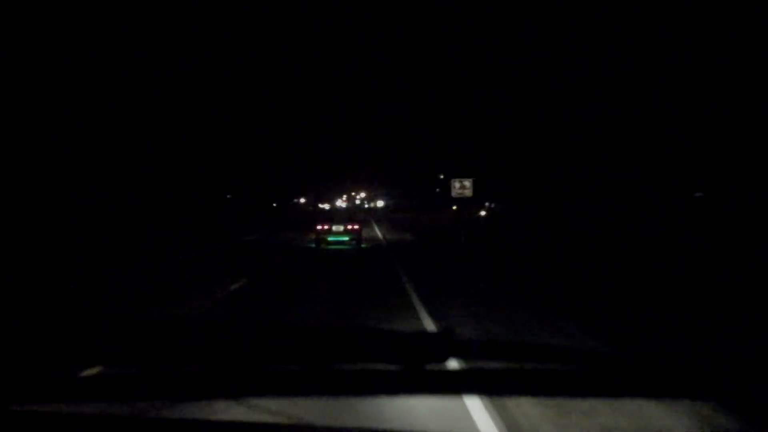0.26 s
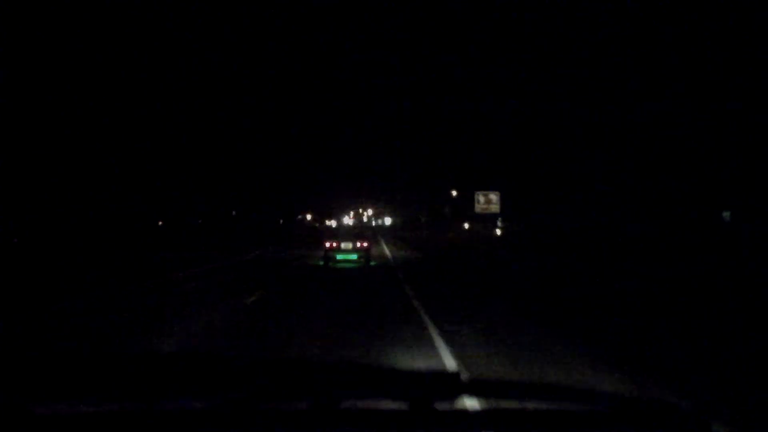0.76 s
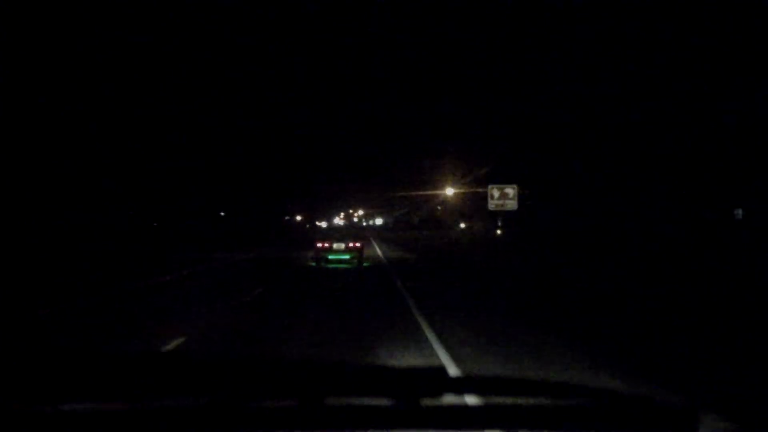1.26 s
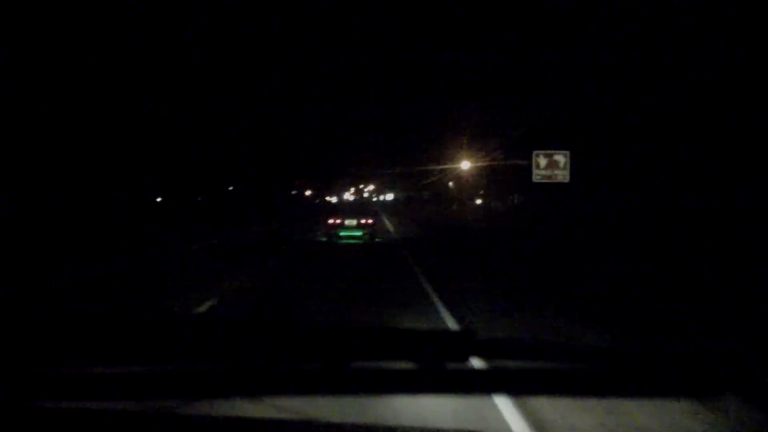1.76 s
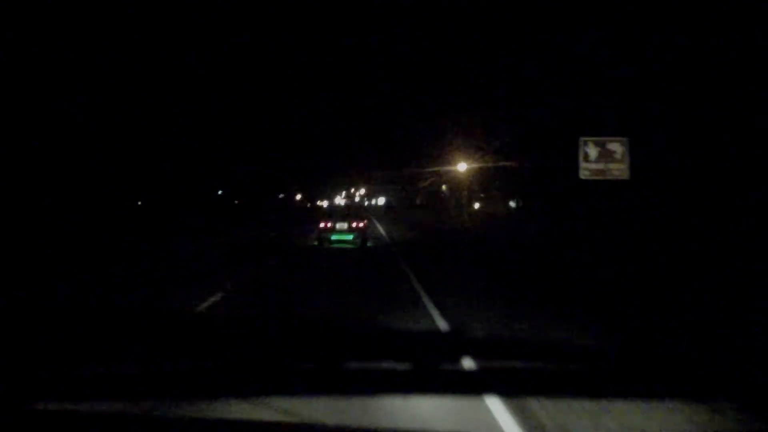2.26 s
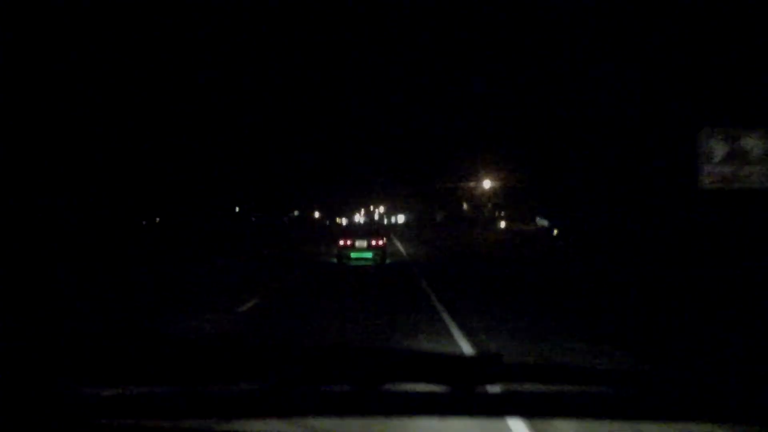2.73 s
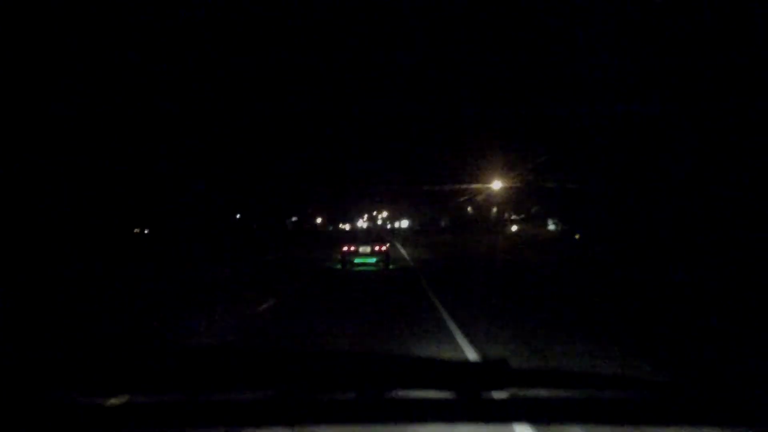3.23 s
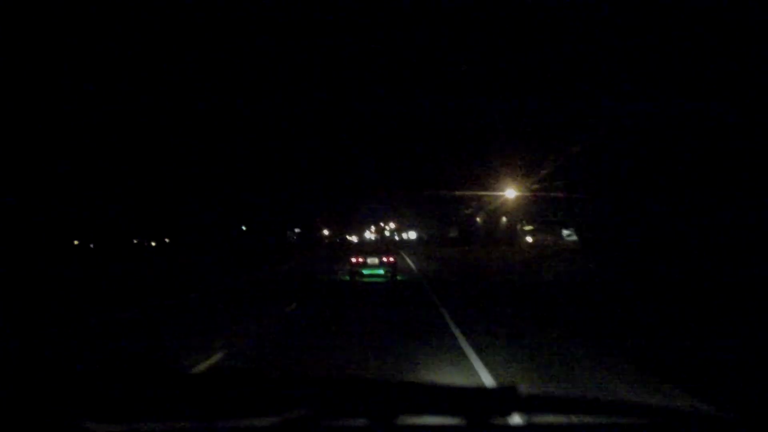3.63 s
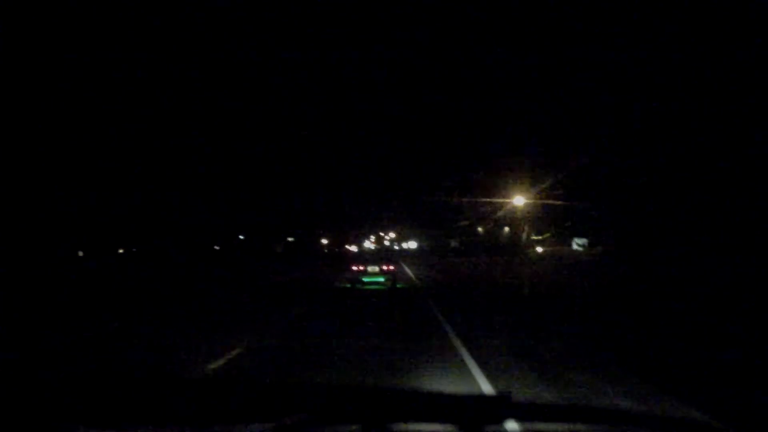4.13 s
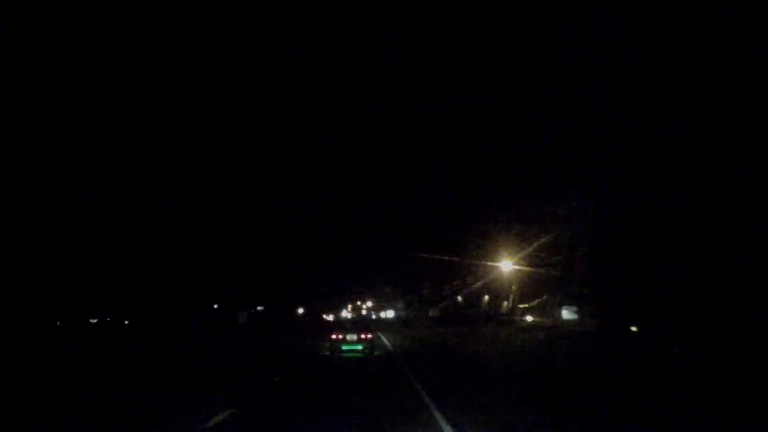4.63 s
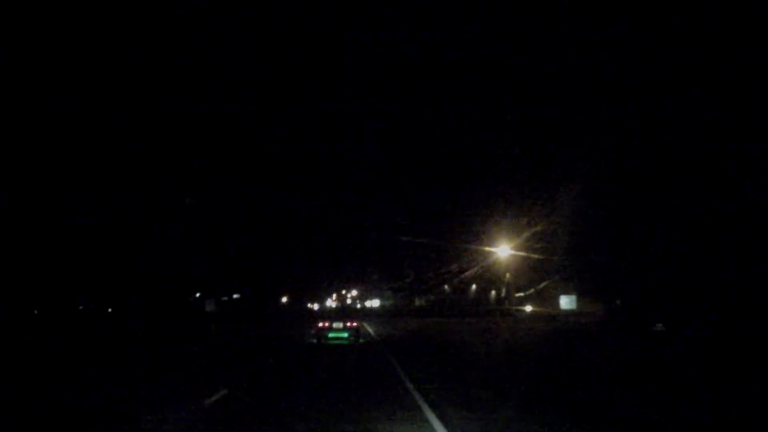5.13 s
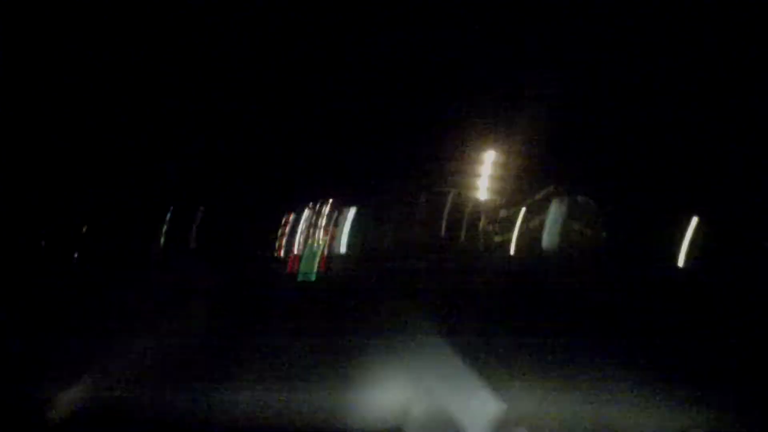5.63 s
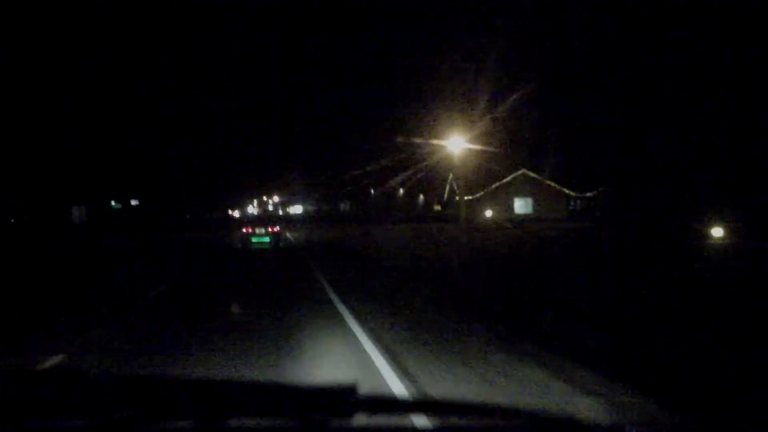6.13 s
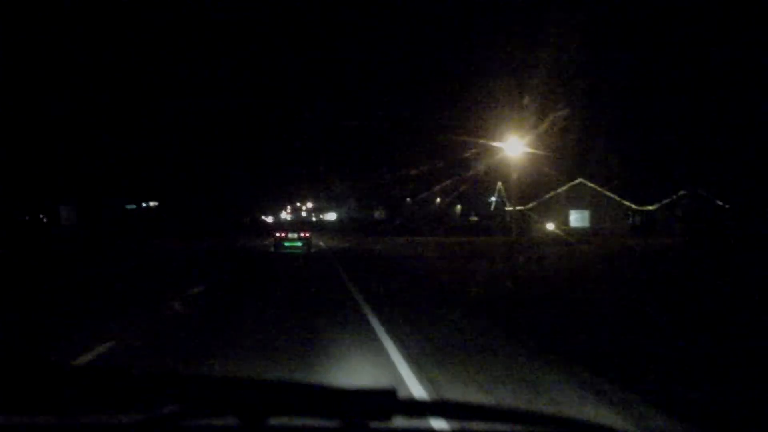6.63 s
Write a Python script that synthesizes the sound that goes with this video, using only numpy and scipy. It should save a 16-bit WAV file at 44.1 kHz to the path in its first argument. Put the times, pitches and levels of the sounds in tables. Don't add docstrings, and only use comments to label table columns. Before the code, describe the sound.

Inside a car cabin, a low engine drone cruises over road rumble, gently strains, then drops a gear with a jolt and revs hard.

```python
import sys
import numpy as np
from scipy import signal
from scipy.io import wavfile
from scipy.ndimage import uniform_filter1d

SR = 44100
rng = np.random.default_rng(int(sys.argv[2]) if len(sys.argv) > 2 else 0)


def wav_record(signal):
    frames = np.transpose(np.atleast_2d(signal))
    bounded = np.clip(frames, -1, 1)
    quanta = np.round(bounded * 32767).astype(np.int16)
    wavfile.write(sys.argv[1], SR, quanta)


def level_to_linear(level):
    exponent = np.asarray(level, float) / 20
    return 10 ** exponent


N = 303849

# time_s, cycle_rate_hz
ENGINE_SPEED = [(0.0, 12.6), (1.9, 12.47), (2.2, 13.15), (2.7, 14.07), (3.2, 14.25), (4.3, 14.36),
                (4.9, 16.15), (5.22, 17.1), (5.4, 18.15), (5.58, 18.0), (5.66, 27.5), (5.72, 32.1),
                (5.82, 34.7), (5.875, 35.1), (5.99, 33.05), (6.11, 33.9), (6.5, 34.45), (6.89, 35.5)]
# order_of_cycle, light_throttle_db (at LIGHT_HZ), wide_open_db (at FULL_HZ)
ORDER_LEVELS = [(1, -34, -24), (2, -30, -16), (3, -24, -10), (4, -34, -21), (5, -32, -24), (6, -25, -28),
                (7, -25, -29), (9, -33, -21), (10, -45, -41), (11, -35, -41), (12, -39, -33),
                (13, -44, -35), (14, -42, -34), (15, -34, -39), (16, -39, -34), (17, -55, -36),
                (18, -44, -35), (19, -36, -33), (20, -43, -39), (21, -44, -46), (22, -49, -45),
                (23, -56, -44), (24, -49, -48), (25, -56, -44), (28, -69, -50), (41, -53, -56),
                (42, -50, -48)]
# frequency_hz, gain_db
CABIN_RESPONSE = [(12, -3), (45, 0.5), (70, -12), (86, 1.5), (106, 9), (120, -0.5), (135, -7), (165, -2.5),
                  (200, -11.5), (245, -18.5), (288, -3.5), (320, -8), (350, -20.5), (600, -1.5)]
# frequency_hz, level_db
FIRING_BOOM = [(102, -24), (107, -14), (112.5, -10), (115, -11.5), (124, -17.5), (137, -31), (165, -10),
               (178, -27.5)]
# frequency_hz, width_hz, gain_db
CABIN_PEAKS = [
    (865, 22, 9),
    (1000, 25, 9),
]
# centre_s, gain_db, length_s, lowest_order, highest_order
LOAD_SURGES = [
    (5.45, 5, .32, 6, 14),
    (5.79, 5.5, .24, 1, 6),
]
LIGHT_HZ, FULL_HZ = 14.25, 34.5
COAST_HZ, PULL_HZ = 12.6, 14.1
COAST_DB, PULL_DB = -10.5, -0.6
EFFORT_DB = 3.5
FIRING_ORDER = 8
HIGH_ORDERS, HIGH_LIGHT_DB, HIGH_FULL_DB = range(26, 45), -63, -44
STEP = 8


def engine(t):
    slow = t[::STEP]
    cycle_hz = curve(ENGINE_SPEED, slow)
    turns = np.cumsum(cycle_hz) * STEP / SR
    wide = np.clip((cycle_hz - LIGHT_HZ) / (.96 * FULL_HZ - LIGHT_HZ), 0, 1) ** 1.3
    load_db = np.interp(cycle_hz, [COAST_HZ, PULL_HZ], [COAST_DB, PULL_DB])
    load_db += EFFORT_DB * (throttle(slow) - .22)
    flutter = wander(7, count=90, size=len(slow))
    start_phase = rng.uniform(-np.pi, np.pi, 45)

    firing_db = np.maximum(read(FIRING_BOOM, FIRING_ORDER * cycle_hz), -60 + 36.6 * wide)
    firing_db += 1.0 * flutter[FIRING_ORDER]
    out = level_to_linear(firing_db) * np.cos(2 * np.pi * FIRING_ORDER * turns + 2.06)

    listed = [row[0] for row in ORDER_LEVELS]
    high = [(k, HIGH_LIGHT_DB, HIGH_FULL_DB) for k in HIGH_ORDERS if k not in listed]
    for k, light_db, full_db in list(ORDER_LEVELS) + high:
        light_source_db = light_db - read(CABIN_RESPONSE, k * LIGHT_HZ)
        full_source_db = full_db - read(CABIN_RESPONSE, k * FULL_HZ)
        level_db = light_source_db * (1 - wide) + full_source_db * wide
        level_db += read(CABIN_RESPONSE, k * cycle_hz)
        level_db += load_db * min(k / 6, 1) * (1 - wide)
        for s, db, length, lowest, highest in LOAD_SURGES:
            if lowest <= k <= highest:
                level_db += db * hump(slow, s, length)
        level_db += .3 * wide + (2.2 - .9 * wide) * flutter[k]
        for f, width, db in CABIN_PEAKS:
            level_db += wide * db * np.exp(-((k * cycle_hz - f) / width) ** 2)
        lined_up = .7 * wide * max(1 - ((k - 3.5) / 2.5) ** 4, 0)
        jitter = (.1 + .005 * k) * flutter[k + 45]
        phase = 2 * np.pi * k * turns - .7 + start_phase[k] * (1 - lined_up) + jitter
        out -= level_to_linear(level_db) * np.cos(phase)
    return np.sqrt(2) * signal.resample_poly(out, STEP, 1)[:N], np.interp(t, slow, turns)


# time_s, throttle_opening (0-1)
PEDAL_TRAVEL = [(0, 0.23), (1.9, 0.2), (2.5, 0.24), (4.35, 0.27), (5.12, 0.43), (5.35, 0.48), (5.45, 0.61),
                (5.6, 0.68), (5.7, 0.79), (5.83, 0.87), (5.93, 0.93), (6.08, 0.89), (6.89, 0.94)]


def throttle(t):
    return np.clip(curve(PEDAL_TRAVEL, t), 0, 1)


# centre_s, peak_db, pitch_hz, length_s
BODY_JOLTS = [
    (5.587, 2.3, 25, .08),
    (5.8, -11, 33, .2),
    (5.635, -21, 600, .035),
    (5.74, -20, 352, .16),
    (5.66, -15, 300, .1),
    (5.67, -15, 220, .1),
    (5.72, -10, 65, .14),
    (5.9, -17, 205, .3),
]


def jolts(t):
    out = np.zeros(N)
    for s, db, hz, length in BODY_JOLTS:
        out -= level_to_linear(db) * hump(t, s, length) * np.sin(2 * np.pi * hz * (t - s))
    return out


# start_s, peak_db
TRIM_TICKS = [(0.2958, -45.5), (2.0675, -46), (2.4383, -44), (2.7618, -43.5), (3.349, -44.5), (3.6414, -42),
              (4.1616, -45), (4.5057, -40.5), (4.7125, -40), (5.185, -24.5), (5.715, -30.5),
              (5.7626, -37.5)]
# start_s, peak_db, t60_s
TRIM_RATTLE = [
    (6.1208, -11, 0.06),
    (6.1255, -8.5, 0.06),
    (6.138, -19, 0.06),
]
# frequency_hz, level_db
RATTLE_SPECTRUM = [(450, -30), (700, 7), (1050, 5), (2400, -7), (4900, -4), (6500, -12), (9900, -14),
                   (14200, -27)]
# start_s, end_s, pitch_hz, level_db
TRIM_SQUEAK = (6.145, 6.215, 8430, -42)
TICK_LO_HZ, TICK_HI_HZ, TICK_T60 = 900, 10000, .044


def trim(t):
    white = rng.standard_normal(N)
    out = np.zeros(N)
    b, a = signal.butter(2, [TICK_LO_HZ, TICK_HI_HZ], "band", fs=SR)
    for s, db in TRIM_TICKS:
        part = slice(round(s * SR), round(s * SR) + 4096)
        tick = evened(signal.lfilter(b, a, white[part]))
        out[part] += level_to_linear(db - 4) * tick * dying(t[part], s, TICK_T60, rise=0.00057)

    bright = evened(causal(rng.standard_normal(N), RATTLE_SPECTRUM))
    for s, db, t60 in TRIM_RATTLE:
        out += bright * level_to_linear(db - 4) * dying(t, s, t60, rise=0.0005)

    start, end, hz, db = TRIM_SQUEAK
    swell = np.sin(np.pi * np.clip((t - start) / (end - start), 0, 1))
    unsteady_phase = 1.5 * wander(130, count=1)[0]
    return out + level_to_linear(db) * swell * np.sin(2 * np.pi * hz * t + unsteady_phase)


# frequency_hz, density_db_per_hz
CRUISE_SPECTRUM = [(180, -25.5), (300, -7.5), (341, -13), (370, -13), (479, -15.5), (519, -7), (640, -10),
                   (728, -10), (913, -11.5), (1340, -15.5), (1580, -24), (5130, -38.5), (9010, -45),
                   (14200, -54.5)]
# frequency_hz, density_db_per_hz
FULL_SPECTRUM = [(200, -39.5), (363, -14), (600, -15), (850, -19), (1130, -26), (1300, -21), (1590, -21.5),
                 (2800, -26.5), (6870, -40.5), (9120, -41.5), (12000, -49), (14200, -57.5)]
QUIET_DB, LOUD_DB = -45, -25
FRAME = 1024


def roar(t, turns):
    def colour(hz, frames):
        opening = throttle(frames)
        tyres = read(CRUISE_SPECTRUM, hz)[:, None] * (1 - opening)
        return tyres + read(FULL_SPECTRUM, hz)[:, None] * opening

    opening = throttle(t)
    level_db = QUIET_DB + (LOUD_DB - QUIET_DB) * opening
    level_db += 1.9 * opening * np.cos(2 * np.pi * turns - 1.2)
    level_db += .45 * wander(40, count=1)[0]
    return noise(colour, level_db, lo_hz=400, frame=FRAME, patchy_db=0.48)


# frequency_hz, level_db
RUMBLE_SPECTRUM = [(8, -18), (15, -4), (25, -0.5), (33, -6), (45, -5), (58, -13), (80, -40), (120, -130)]
# frequency_hz, level_db
DRONE_SPECTRUM = [(40, -29.5), (60, -0.5), (100, 2), (130, -3.5), (190, -6), (250, -15.5), (300, -17),
                  (380, -21), (480, -51.5), (700, -130)]
# centre_s, rumble_change_db, drone_change_db, length_s
ROAD_BUMPS = [
    (.25, 2, 1, .6),
    (1.25, -2, -5, .5),
    (5.66, -3, 14, .12),
    (5.8, -2, 10, .2),
]
RUMBLE_DB, RUMBLE_SWELL_DB, DRONE_DB, DRONE_SWELL_DB = -20, 0.8, -29.5, 0.4


def road(t):
    swell = wander(6, count=2)
    rumble_db = RUMBLE_DB + RUMBLE_SWELL_DB * swell[0]
    drone_db = DRONE_DB + DRONE_SWELL_DB * swell[1] + 6 * throttle(t)
    for s, low_db, panel_db, length in ROAD_BUMPS:
        bump = hump(t, s, length) ** 2
        rumble_db += low_db * bump
        drone_db += panel_db * bump

    rumble = noise(lambda hz, _: read(RUMBLE_SPECTRUM, hz)[:, None], 0,
                   lo_hz=0, frame=16 * FRAME, patchy_db=-3)
    rumble /= np.sqrt(uniform_filter1d(rumble ** 2, size=SR // 3))
    drone = noise(lambda hz, _: read(DRONE_SPECTRUM, hz)[:, None], drone_db,
                  lo_hz=0, frame=4 * FRAME, patchy_db=0.5)
    return level_to_linear(rumble_db) * rumble + drone


def noise(shape_db, level_db, lo_hz, frame, patchy_db):
    overlap = frame * 3 // 4
    hz, t, z = signal.stft(rng.standard_normal(N), SR, nperseg=frame, noverlap=overlap)
    gain = level_to_linear(shape_db(hz, t)) * np.ones(z.shape)
    gain /= np.sqrt((gain[hz > lo_hz] ** 2).sum(0) / len(hz))
    patches = uniform_filter1d(rng.standard_normal(z.shape), size=10, axis=0)
    patches = uniform_filter1d(patches, size=10, axis=1)
    gain *= level_to_linear(patchy_db * evened(patches))
    out = signal.istft(z * gain, SR, nperseg=frame, noverlap=overlap)[1][:N]
    return out * level_to_linear(level_db)


def causal(x, points):
    size = 1 << 15
    log_gain = np.log(level_to_linear(read(points, abs(np.fft.fftfreq(size, 1 / SR)))))
    phase = -signal.hilbert(log_gain).imag
    taps = np.fft.ifft(np.exp(log_gain + 1j * phase)).real[:size // 2]
    return signal.oaconvolve(x, taps)[:len(x)]


def dying(t, s, t60, rise):
    since = np.maximum(t - s, 0)
    return (1 - np.exp(-since / rise)) * level_to_linear(-60 * since / t60)


def hump(t, s, length):
    return np.cos(np.pi * np.clip((t - s) / length, -.5, .5))


def wander(rate_hz, count, size=N):
    knots = rng.standard_normal((int(N / SR * rate_hz) + 3, count))
    knots = uniform_filter1d(knots, size=2, axis=0) * np.sqrt(2)
    at = np.arange(size) / size * N / SR * rate_hz
    return [np.interp(at, np.arange(len(knots)), k) for k in knots.T]


def curve(rows, t):
    s, value = np.transpose(rows)
    return np.interp(t, s, value)


def read(points, hz):
    f, value = np.transpose(points)
    return np.interp(np.log(hz + 1), np.log(f + 1), value)


def evened(x):
    return x / np.sqrt(np.mean(x ** 2) + 1e-20)


# frequency_hz, unlike_part_db
PORT_DIFFERENCE = [(100, -60), (300, -38), (670, -31), (1230, -25), (2240, -16), (4100, -11), (7500, -8),
                   (13700, -3)]
LAG_HZ = 8000


def two_ports(bass, treble):
    hz, _, z = signal.stft(np.pad(treble, (0, FRAME)), SR, nperseg=256)
    unlike = level_to_linear(read(PORT_DIFFERENCE, hz))[:, None] * abs(z) * np.exp(2j * np.pi * rng.random(z.shape))
    lead = np.exp(-.5j * (hz / LAG_HZ) ** 1.5)[:, None]
    pair = np.array([(z + unlike) * lead, (z - unlike) / lead])
    ports = signal.istft(pair, SR, nperseg=256)[1][:, :N]
    slope = level_to_linear(-6.5) * np.gradient(bass)
    return ports + np.array([bass - slope, bass + slope])


def scene():
    t = np.arange(N) / SR
    motor, turns = engine(t)
    treble = roar(t, turns) + trim(t)
    return two_ports(motor + road(t) + jolts(t), treble)


# frequency_hz, width_hz, depth (0-1)
HOUSING_NOTCHES = [
    (7870, 500, 1),
    (11150, 110, .75),
]


def housing(x):
    for hz, width, depth in HOUSING_NOTCHES:
        b, a = signal.iirpeak(hz, hz / width, fs=SR)
        x = x - depth * signal.lfilter(b, a, x)
    return x


def band_limit(x):
    return signal.sosfilt(signal.butter(12, 15200, fs=SR, output="sos"), x)


def record(dry):
    faded = dry * np.minimum(np.arange(N) / 128, 1)
    heard = housing(faded)
    overloaded = heard / (1 + abs(heard / .98) ** 30) ** (1 / 30)
    return band_limit(overloaded)


dry = scene()
out = record(dry)
wav_record(out)
```